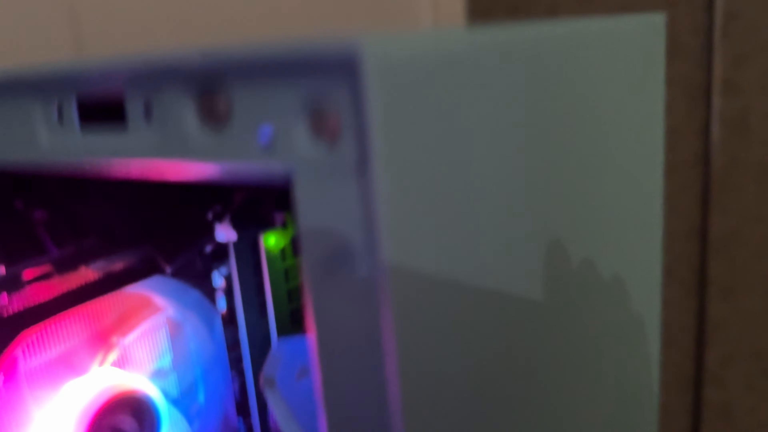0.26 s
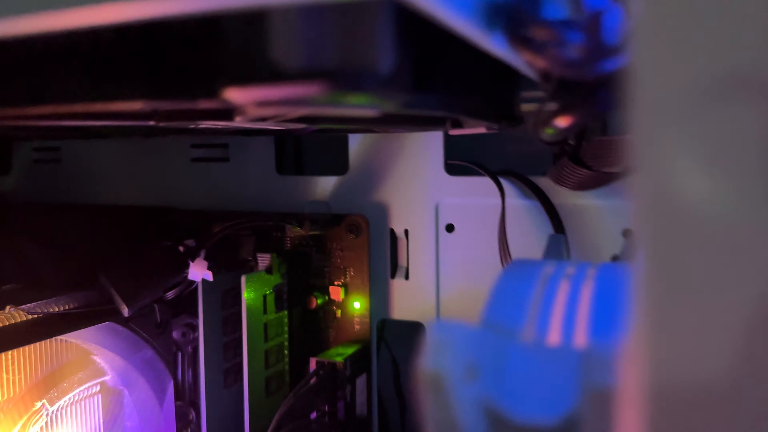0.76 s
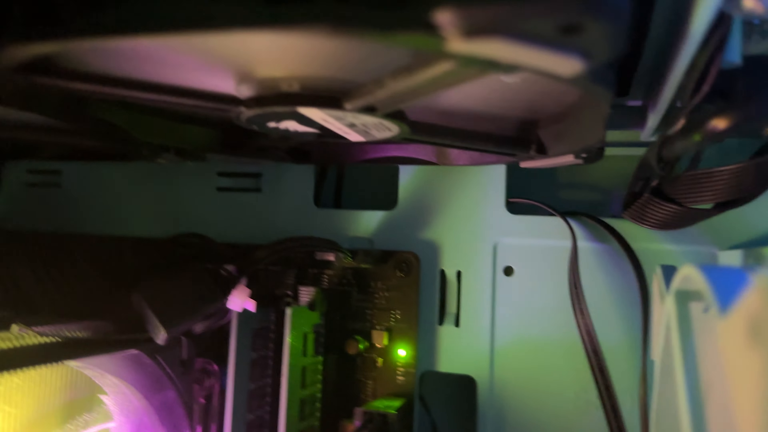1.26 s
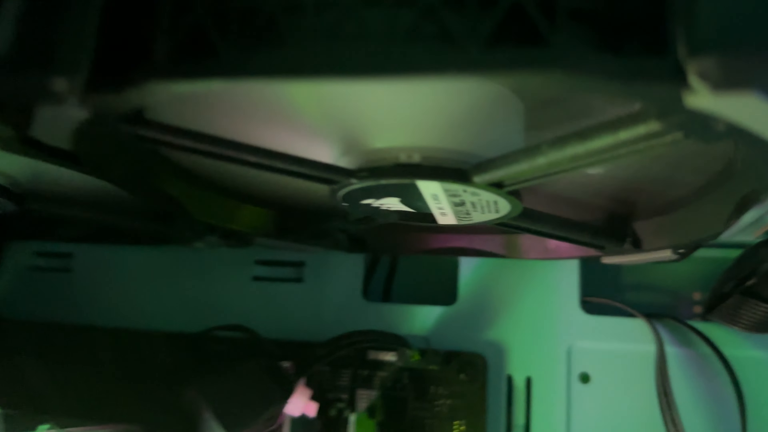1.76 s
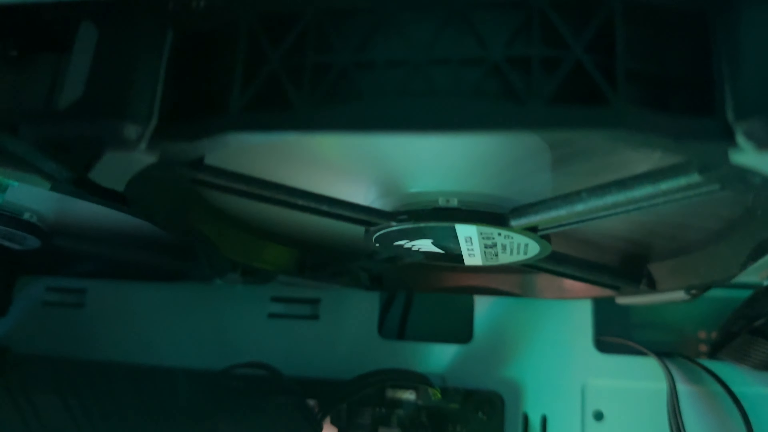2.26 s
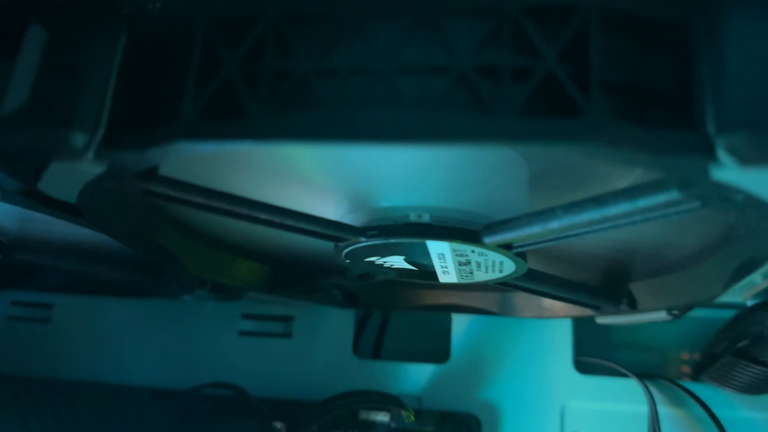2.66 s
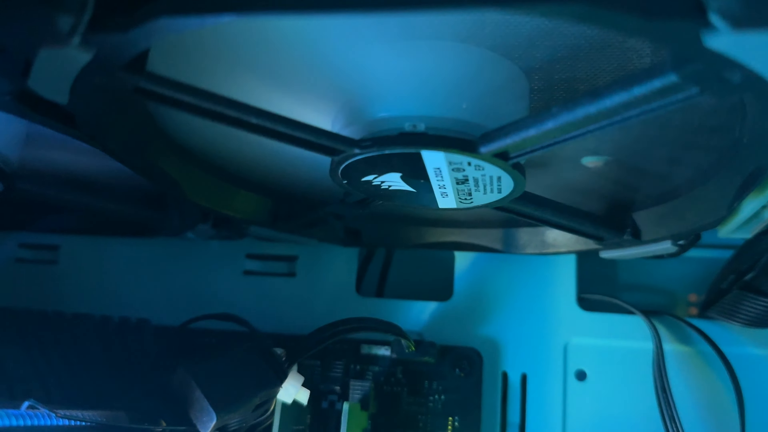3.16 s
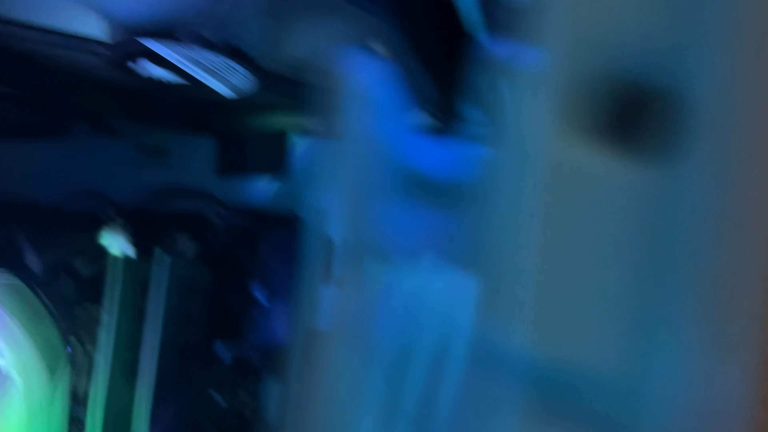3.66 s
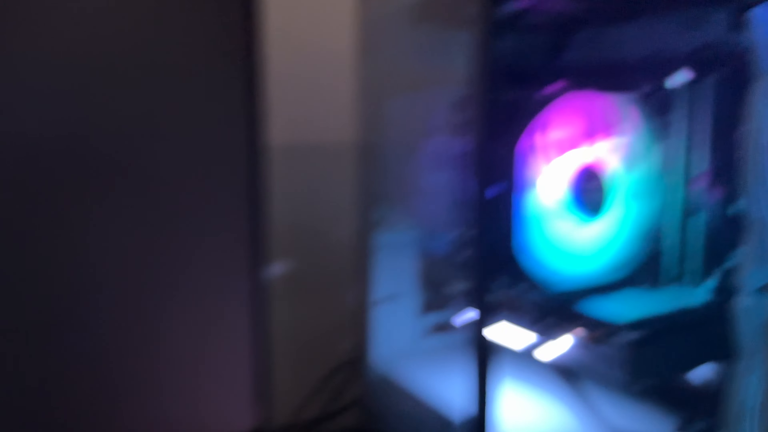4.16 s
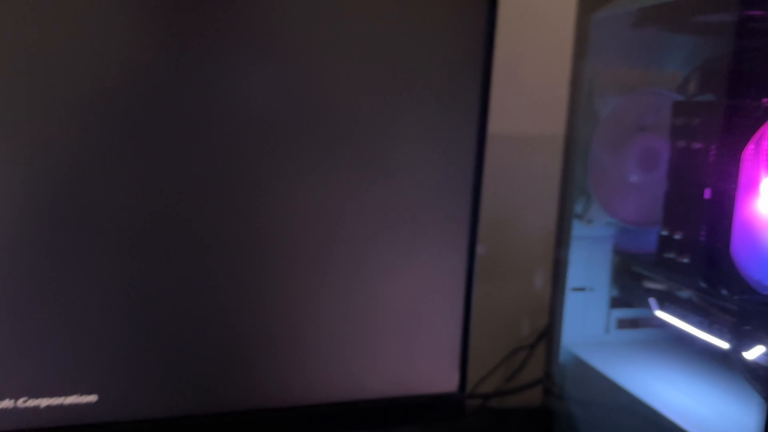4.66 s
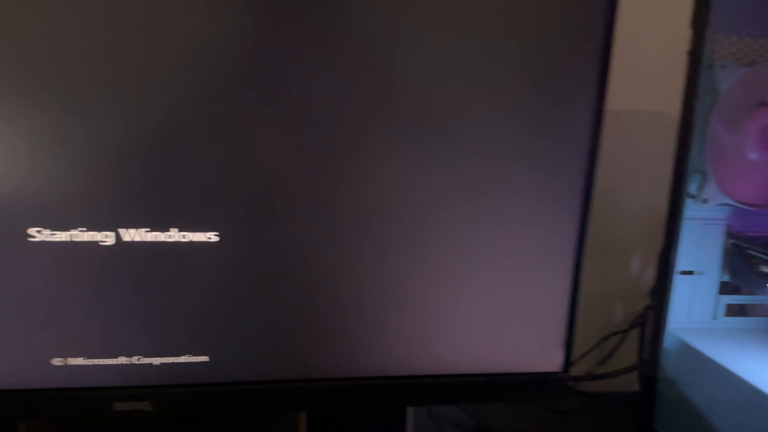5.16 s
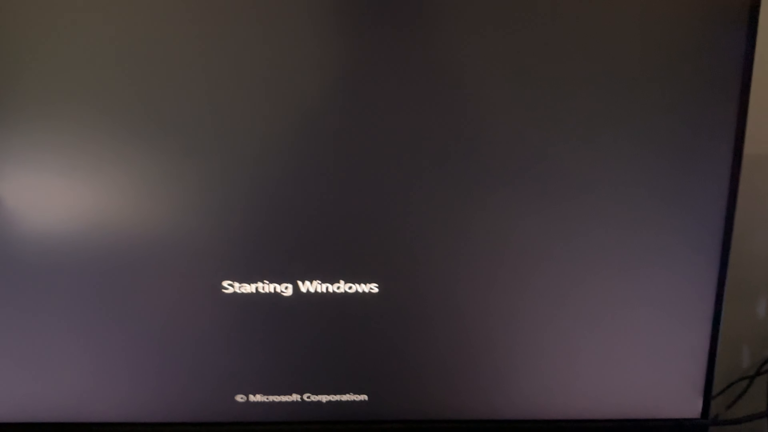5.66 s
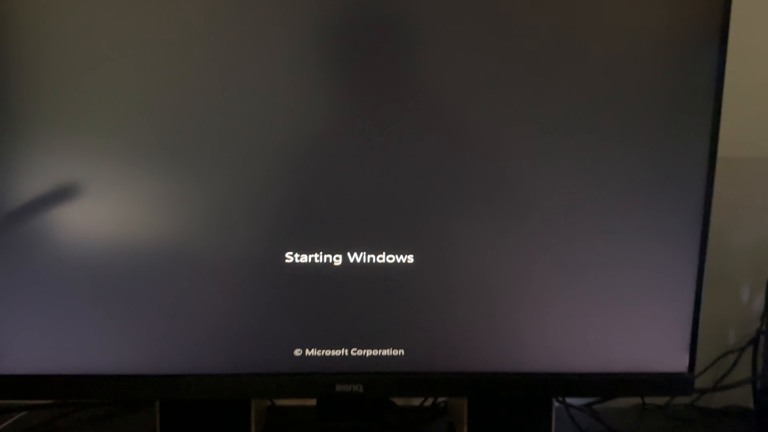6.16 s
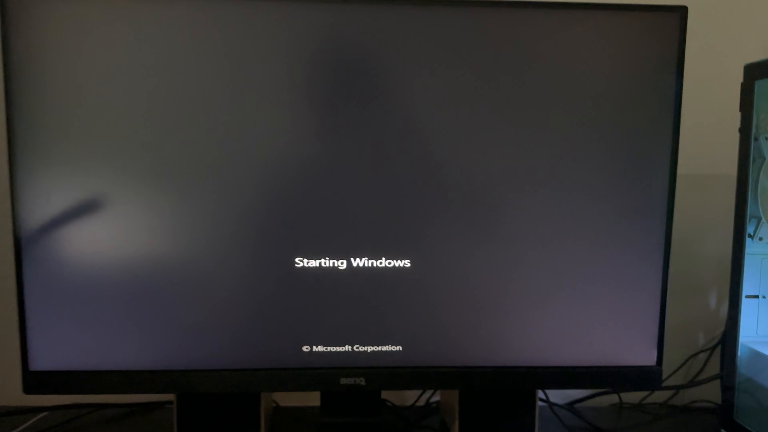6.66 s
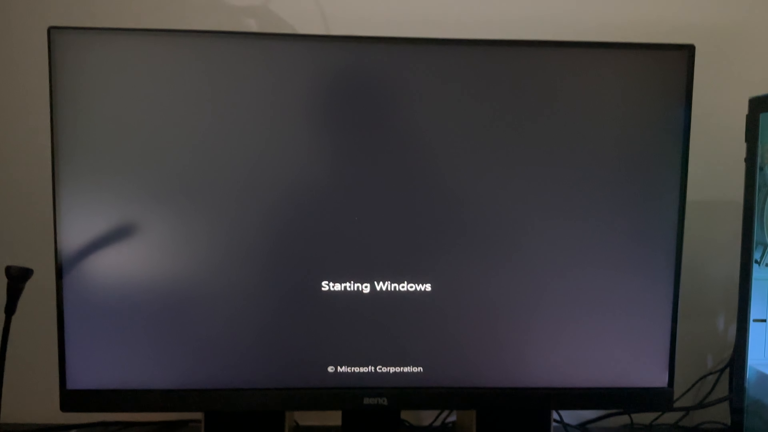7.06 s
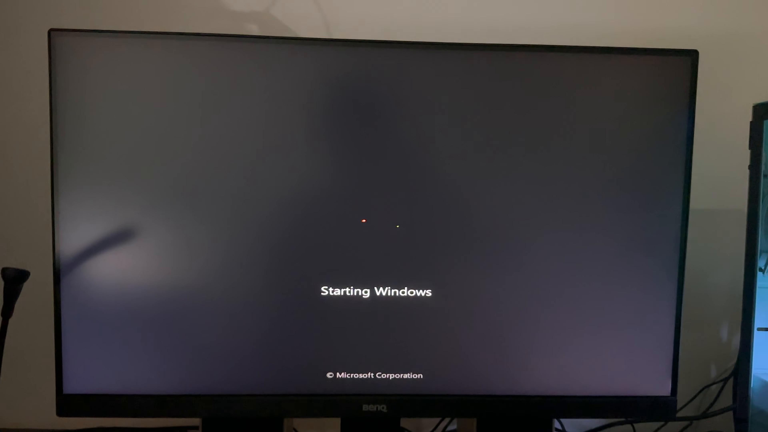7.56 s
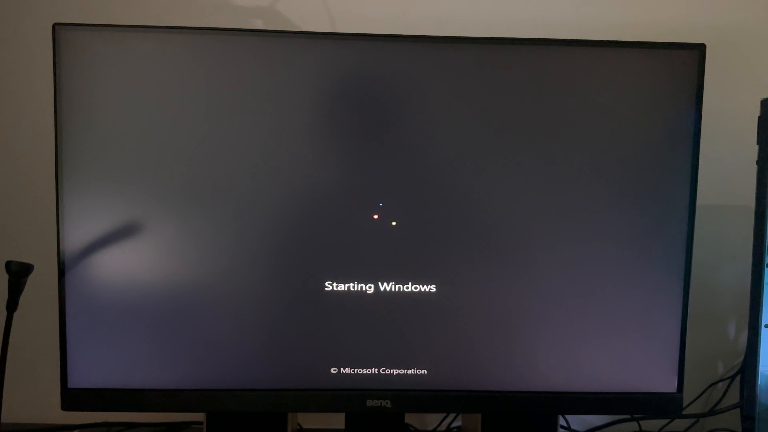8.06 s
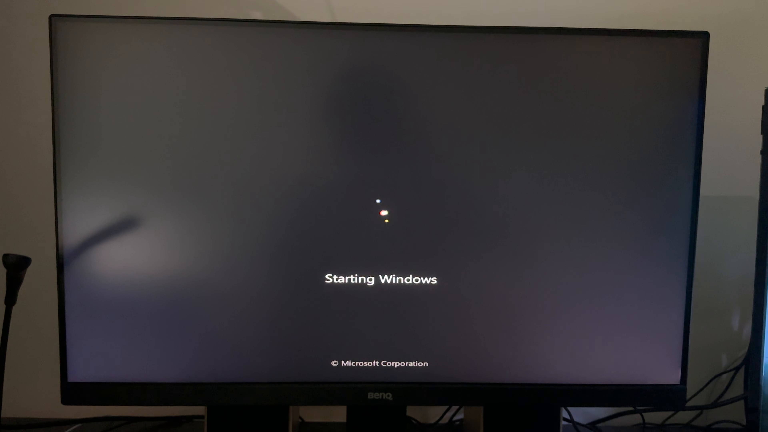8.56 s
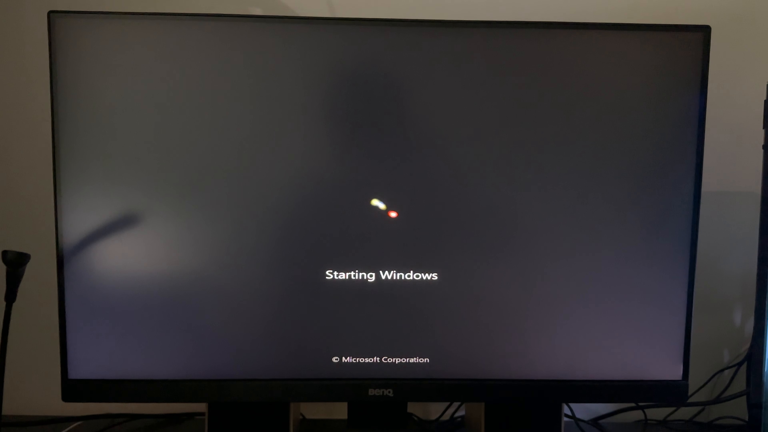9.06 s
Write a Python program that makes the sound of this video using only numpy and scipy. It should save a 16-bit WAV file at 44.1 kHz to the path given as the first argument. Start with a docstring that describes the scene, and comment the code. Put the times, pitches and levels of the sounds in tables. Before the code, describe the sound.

A case fan blows loudly onto the microphone with fluttering low thuds, recedes, a single sharp bang rings briefly, then distant fan hum continues.

```python
"""A computer case fan in a small room: shaped noise for its rush and its diffuse sound, sines for the blade tone.
A handheld two-port microphone starts in the air stream, where low noise buffets the ports and eddies
thump as waves of falling pitch, then draws back. Something slams once (noise crack with a sharp front of
band-passed bursts, plus decaying modes); ticks and a soft rustle, also band-passed noise, follow.
The fan hums on from further off."""
import sys
import numpy as np
from scipy import signal
from scipy.fft import rfft, irfft
from scipy.io import wavfile
from scipy.ndimage import uniform_filter1d

SR = 44100
rng = np.random.default_rng(int(sys.argv[2]) if len(sys.argv) > 2 else 0)


def gain_from_db(level_db):
    """Convert decibel levels to linear amplitude factors (20 dB per decade)."""
    decades = np.asarray(level_db, float) / 20
    return 10 ** decades


def store_wav(level_fs):
    """Save 16-bit WAV to argv[1]."""
    pcm = np.round(np.clip(np.atleast_2d(level_fs), -1, 1) * 32767)
    wavfile.write(sys.argv[1], SR, pcm.T.astype(np.int16))


N = 410130


def evened(x):
    """Scaled to rms 1."""
    return x / np.sqrt(np.mean(abs(x) ** 2) + 1e-20)


def read(points, hz):
    """A spectrum table at hz, interpolated over log frequency."""
    f, value = np.transpose(points)
    return np.interp(np.log(hz + 1), np.log(f + 1), value)


def played(rows, s):
    """Every column of a time table at the times s."""
    t, *columns = np.transpose(rows)
    return [np.interp(s, t, c) for c in columns]


def shape(points, hz, lo_hz, hi_hz):
    """A spectrum in dB whose power between lo_hz and hi_hz sums to 1."""
    db = read(points, hz)
    in_band = (hz > lo_hz) & (hz < hi_hz)
    return db - 10 * np.log10(np.sum(gain_from_db(db[in_band]) ** 2))


def above(hz, corner_hz):
    """Smooth step from 0 to 1 around corner_hz."""
    return 1 / (1 + (corner_hz / (hz + 1)) ** 4)


def below(hz, corner_hz):
    """Smooth step from 1 to 0 around corner_hz."""
    return 1 / (1 + (hz / corner_hz) ** 4)


def resonances(rows, hz):
    """Sum of bell-shaped peaks or dips in dB."""
    return sum(db / (1 + (2 * (hz - f) / width_hz) ** 2) for f, width_hz, db in rows)


def sides(pan_db):
    """Left and right gains for a level gap between the ports."""
    return gain_from_db(np.array([pan_db / 2, -pan_db / 2]))


def add(mix, s, sound):
    """Mixes a two-channel sound in at time s."""
    part = mix[:, round(s * SR):][:, :sound.shape[1]]
    part += sound[:, :part.shape[1]]


def wander(rate_hz, count):
    """Slow random drifts of rms 1: 24 sines up to rate_hz, the slower the stronger."""
    t = np.arange(0, N / SR + 1, 1 / 200)
    drifts = []
    for turns in rng.random((count, 24)):
        partials = zip(np.geomspace(rate_hz / 8, rate_hz, 24), turns)
        drift = sum(np.sin(2 * np.pi * (f * t + p)) / np.sqrt(f) for f, p in partials)
        drifts.append(np.interp(np.arange(N) / SR, t, evened(drift)))
    return drifts


# left-right likeness before same_scale, near mono at the top: (frequency [Hz], correlation [0-1])
LIKENESS = [(60, 0.72), (150, 0.78), (400, 0.46), (700, .25), (1500, 0.083), (6800, 0.084), (9000, 0.34),
            (15000, 0.794)]
# (frequency [Hz], lead of the left channel [rad])
LEFT_LEAD = [(0, 0), (520, 0), (860, -2.5), (1460, -1), (2070, -1.9), (3450, 4), (6370, 12.5), (7490, 14),
             (10600, 12.6), (16000, 12.6)]


def noise(colour, seconds, size, same_scale=1, patchy_db=.7):
    """Two-channel noise: colour(hz, s) gives level and side gap in dB; faint patches drift across it."""
    hz = np.fft.rfftfreq(size, 1 / SR)[:, None]
    s = np.arange(int(seconds * SR) * 4 // size + 6) * size / 4 / SR
    a, b, c, d, patches = rng.standard_normal((len(s), len(hz), 5)).T
    patches = evened(uniform_filter1d(uniform_filter1d(patches, 12, 0), 8, 1))
    same = np.clip(same_scale * read(LIKENESS, hz), -1, 1)
    left = a + 1j * b
    right = same * left + np.sqrt(1 - same ** 2) * (c + 1j * d)
    right = right * np.exp(-1j * read(LEFT_LEAD, hz))
    level_db, pan_db = colour(hz, s)
    z = np.array([left, right]) * gain_from_db(level_db + patchy_db * patches) * sides(pan_db + 0 * patches)
    sound = signal.istft(z, nperseg=size, noverlap=size * 3 // 4)[1]
    return np.sqrt(3 / 2) * sound[:, :int(seconds * SR)]  # offsets the overlap's averaging


# path of the microphone: (time [s], distance from the fan [m], turn as left over right [dB])
PATH = [(0, 0.24, 0), (.4, 0.31, 5.5), (.9, 0.27, 2), (1.5, 0.19, 0), (2.4, 0.15, -3.5), (3.4, 0.19, -1),
        (3.7, 0.31, 5), (3.95, 0.54, 1), (4.3, 0.96, -11), (5.3, 0.83, -3), (6.5, 1.34, -4)]
JET_DB_AT_1M = -62


def jet_db(s):
    """Level of the close rush, falling 6 dB per doubling of distance."""
    return JET_DB_AT_1M - 20 * np.log10(np.maximum(played(PATH, s)[0], .05))


# colour facing the fan: (frequency [Hz], relative level [dB])
JET_FACING = [(260, -27), (450, -15), (600, -9.5), (850, -8), (1000, -16.5), (1200, -7.5), (1450, -15.5),
              (2300, -17), (3600, -22.5), (4700, -22), (5250, -23.5), (6300, -25.5), (7500, -28),
              (10500, -34.5), (12000, -45), (15500, -44.5), (16300, -81.5)]
# colour from the side: (frequency [Hz], relative level [dB])
JET_ASLANT = [(260, -41), (450, -3.5), (485, -7), (815, 0), (892, -20.5), (1020, -1.5), (1330, 0.5),
              (2840, -6.5), (3400, -18), (5890, -11.5), (7470, -23.5), (10400, -26.5), (15700, -45)]
# (time [s], share of the facing colour [0-1])
FACING = [(.4, 0.03), (.65, 0.88)]
# lift of the rush over 4 kHz: (time [s], level [dB])
JET_TREBLE = [(.7, 1), (1.3, 0.5), (2.2, -1.5), (2.9, -0.5), (3.5, 3), (4, 0)]
# (frequency [Hz], left over right before the turn is added [dB])
JET_SIDES = [(60, 6), (110, 9.5), (200, 8.0), (380, 3.5), (700, 12.5), (1290, 6.5), (2380, 1.5),
             (4400, 9.5), (8120, 5), (15000, -3)]


def jet():
    """Broad rush off the blades; its colour shifts as the microphone turns to face the fan."""
    def colour(hz, s):
        facing = np.clip(played(FACING, s)[0], 0, 1)
        facing_db = facing * shape(JET_FACING, hz, 600, 6000)
        aslant_db = (1 - facing) * shape(JET_ASLANT, hz, 600, 6000)
        treble_db = played(JET_TREBLE, s)[0] * above(hz, 4000)
        turn_db = played(PATH, s)[1]
        return facing_db + aslant_db + treble_db + jet_db(s), read(JET_SIDES, hz) + turn_db
    return noise(colour, N / SR, size=1024, patchy_db=1.5)


# swing from beside the case to the open room: (time [s], share of open room [0-1])
OPENING = [(4.2, .02), (5.3, .45), (5.8, .9), (6.5, .99)]


def beside(s):
    """How far the microphone still stands in the lee of the case, 1 to 0."""
    return 1 - np.clip(played(OPENING, s)[0], 0, 1)


# close blade tone: (time [s], fundamental level [dB], second harmonic level [dB])
CLOSE_BLADES = [(0, -62.5, -58.5), (1, -47.5, -49.5), (2, -46.5, -47), (3, -56, -48), (3.6, -53.5, -51),
                (4, -71, -67.5)]
# (harmonic of the blade rate [-], level re jet [dB], level re open room [dB], left over right [dB])
HARMONICS = [(3, -17.5, -32.5, 16), (4, -26.5, -16, -18), (9, -23.5, -32.5, 14.5), (10, -30, -29, 3),
             (11, -21.5, -37, -1), (12, -30, -37.5, 1)]
BLADE_START_HZ, BLADE_SAG_HZ_PER_S = 211.65, .09
# per partial: fundamental, second harmonic
FAR_BLADES_DB, BESIDE_BLADES_DB = (-56.5, -57), (-16, -7.5)  # in the open room; change beside the case
NEAR_PAN_DB, FAR_PAN_DB = (15, 20.5), (-3, 1)
WAVER_DB, SLIP_RAD = (3, 1.6), (.45, .3)  # rms


def blades():
    """Blade-passing tone and harmonics as sines wavering in level and phase, each beaming its own way."""
    s = np.arange(N) / SR
    lee = beside(s)
    phase = 2 * np.pi * np.cumsum(BLADE_START_HZ - BLADE_SAG_HZ_PER_S * s) / SR
    voices = []  # (harmonic, gain, left over right dB, level waver dB, phase waver rad)
    for k, close_db in enumerate(played(CLOSE_BLADES, s)):
        near = gain_from_db(close_db)
        far = gain_from_db(FAR_BLADES_DB[k] + BESIDE_BLADES_DB[k] * lee)
        pan_db = (near * NEAR_PAN_DB[k] + far * FAR_PAN_DB[k]) / (near + far)
        voices.append((k + 1, near + far, pan_db, WAVER_DB[k], SLIP_RAD[k]))
    for k, near_db, far_db, pan_db in HARMONICS:
        gain = gain_from_db(jet_db(s) + near_db) + gain_from_db(ROOM_DB + far_db - 10.5 * lee)
        voices.append((k, gain, pan_db + 0 * s, 2.2, .35))
    out = np.zeros((2, N))
    for k, gain, pan_db, waver_db, slip_rad in voices:
        swell, drift = wander(14, count=2)
        tone = np.sin(k * phase + slip_rad * drift)
        out += np.sqrt(2) * gain * gain_from_db(waver_db * swell) * sides(pan_db) * tone
    return out


# (frequency [Hz], relative level [dB])
BUFFET_COLOUR = [(20, -22), (40, -2.5), (70, 1.5), (120, 4), (200, -0.5), (350, -2.5), (500, -9),
                 (700, -25.5), (1000, -66)]
# air stream at the ports: (time [s], speed [m/s])
STREAM = [(0, 0.78), (.65, 1.09), (.85, 1.56), (1.6, 1.67), (1.95, 2.53), (2.4, 2.1), (3.2, 2.18),
          (3.5, 1.31), (3.85, .48), (4.2, 0.11)]
BUFFET_DB_AT_1M_PER_S, BUFFET_PAN_DB = -53, 6


def buffet():
    """Lumpy low pressure swings on the ports, growing with the square of the air speed."""
    def colour(hz, s):
        speed_m_per_s = np.maximum(played(STREAM, s)[0], .01)
        level_db = BUFFET_DB_AT_1M_PER_S + 40 * np.log10(speed_m_per_s)
        return shape(BUFFET_COLOUR, hz, 35, 180) + level_db, BUFFET_PAN_DB + 0 * hz
    lumps = gain_from_db(3.2 * wander(30, count=1)[0])
    return noise(colour, N / SR, size=2048, same_scale=0.53) * lumps


# eddies sweeping past: (time [s], peak level before panning [dB], start pitch [Hz], length [s])
EDDIES = [(0.416, -35.5, 2200, 0.0028), (1.871, -17.5, 322, 0.031), (1.943, -16.5, 300, 0.025),
          (1.972, -7.5, 288, 0.01), (1.984, -19, 130, 0.018), (2.004, -16.5, 90, 0.023),
          (2.082, -19, 294, 0.034), (2.119, -22, 170, 0.013), (2.177, -22.5, 128, 0.041),
          (2.231, -23, 170, 0.033), (2.272, -25, 130, .028), (2.363, -28.5, 296, 0.028),
          (2.433, -21, 307, 0.035), (2.618, -23, 443, 0.02), (2.643, -31, 1400, 0.0051),
          (2.707, -33.5, 256, .023), (2.853, -26, 452, 0.027), (2.934, -27, 305, 0.03),
          (3.139, -31, 326, 0.012), (3.155, -27, 130, 0.034), (3.235, -23, 330, 0.015),
          (3.392, -32.5, 244, 0.023)]
EDDY_SLOWING = 0.296  # share of the length in which the pitch falls most of the way
EDDY_END_TURNS, EDDY_PAN_DB = 1.43, 5.5  # end pitch in turns per length


def eddy(db, start_hz, seconds):
    """An uneven pressure wave that slows from start to end pitch as the eddy passes."""
    end_hz = EDDY_END_TURNS / seconds
    u = np.arange(0, 1.5, 1 / (seconds * SR))  # time in lengths
    rough = rng.standard_normal((2, 6000))
    shake, lump = (evened(signal.fftconvolve(v, np.hanning(500), "same"))[:len(u)] for v in rough)
    hz = end_hz + (start_hz - end_hz) * np.exp(-u / EDDY_SLOWING)
    hz = hz * np.exp(.15 * shake)
    swell = np.sin(np.pi * (u / 1.5) ** .5) ** 2 * gain_from_db(2.5 * lump) * (end_hz / hz) ** .3
    wave = swell * np.sin(2 * np.pi * np.cumsum(hz) / SR)
    return gain_from_db(db) * sides(EDDY_PAN_DB)[:, None] * wave / abs(wave).max()


# crack: (frequency [Hz], relative level [dB])
SLAM_COLOUR = [(35, -35), (60, -12), (230, -6.5), (600, -13.5), (800, -12.5), (1000, -6.5), (1400, -9),
               (2900, -14), (4500, -12), (6400, -14), (7400, -27.5), (10000, -24), (15500, -40),
               (16300, -72.5)]
# (frequency [Hz], t60 [s])
SLAM_TAIL = [(100, 0.33), (250, 0.66), (700, 0.43), (1400, 0.37), (2000, 0.32), (3000, 0.28), (5000, .24),
             (12800, 0.19)]
# slower after-sound: (frequency [Hz], level re crack [dB])
SLAM_LATE = [(100, -27), (500, -20), (1500, -18.5), (2500, -29.5), (5000, -29)]
# ring of the struck panels: (frequency [Hz], relative level [dB], t60 [s])
SLAM_MODES = [ (49, -1.5, 0.83), (125, 1, 0.24), (170, -6, 0.33), (209.3, 1.5, 0.196), (253.6, 0.5, .27),
              (494.5, -5.5, .4), (944, -0.5, 0.214), (1011, -1.5, .33), (1184, -3, 0.17), (1362, -5, 0.33),
              (1490, -6, .25), (1610, -10, 0.3), (2020, -6.5, 0.23), (2540, -17, 0.16), (3042, -10, 0.202),
              (3350, -9, 0.15), (4105, -2.5, 0.22), (4344, -10, .18), (4750, 0.5, 0.16)]
SLAM_S, SLAM_DB, SLAM_MODES_DB, SLAM_PAN_DB, SLAM_LATE_T60_S = 5.353, -13.5, -21.5, -2, .6


def slam():
    """A hard blow: a crack that the room carries on band by band, and the ring of the struck panels."""
    def colour(hz, s):
        early = gain_from_db(-60 * s / read(SLAM_TAIL, hz))
        late = gain_from_db(read(SLAM_LATE, hz) - 60 * s / SLAM_LATE_T60_S)
        level_db = shape(SLAM_COLOUR, hz, 60, 15000) + 20 * np.log10(early + late)
        return level_db, SLAM_PAN_DB * np.exp(-s / 0.068) + 0 * hz
    t = np.arange(2 * SR) / SR
    crack = gain_from_db(SLAM_DB) * noise(colour, 2, size=256, same_scale=1.1) * (1 - np.exp(-t / .002))
    ring = np.zeros((2, len(t)))
    starts = 2 * np.pi * rng.random((len(SLAM_MODES), 2, 1)) * [[1], [.2]]
    for (hz, db, t60), (start, gap) in zip(SLAM_MODES, starts):
        # low modes reach both ports nearly in step, higher ones a little apart
        phases = start + np.array([0 * gap, gap * np.minimum(hz / 1000, .8)])
        swell = gain_from_db(SLAM_MODES_DB + db - 60 * t / t60) * (1 - np.exp(-t * hz / 1.1))
        ring += swell * np.sin(2 * np.pi * hz * t + phases)
    return crack + sides(SLAM_PAN_DB)[:, None] * ring


# sharp front of the slam's crack (first two rows), then ticks and a soft rustle:
# (time [s], peak level before panning [dB], centre [Hz], t60 [s], left over right [dB])
BURSTS = [(5.3544, -12.5, 4470, .02, -6.5), (5.354, -16, 9960, 0.025, -5), (5.441, -35, 8500, .012, -6),
          (5.55, -40, 1250, .5, -2), (6.42, -60, 10000, .06, -1)]


def burst(db, hz, t60, pan_db):
    """A short burst of decaying noise, band-passed around one pitch."""
    t = np.arange(12000) / SR
    puff = rng.standard_normal(len(t)) * gain_from_db(-60 * t / t60) * (1 - np.exp(-t / 0.00057))
    band = signal.butter(3, [hz * .6, min(hz * 1.5, 15800)], "band", fs=SR, output="sos")
    pitched = signal.sosfilt(band, puff)
    return gain_from_db(db) * pitched / abs(pitched).max() * sides(pan_db)[:, None]


# (frequency [Hz], relative level [dB])
ROOM_COLOUR = [(25, -12), (45, -3), (65, 4.5), (90, -3.5), (130, 2.5), (220, 6.5), (330, 5.5), (480, 4),
               (560, -3.5), (1250, -3), (2500, -13), (6500, -18.5), (7500, -26.5), (10500, -34),
               (12000, -47), (15500, -51.5), (16200, -80.5)]
# (frequency [Hz], left over right in the open room [dB])
ROOM_SIDES = [(60, -.5), (200, -1), (380, 2), (700, -2), (1100, -3), (1700, -2), (2500, -1), (3700, 2),
              (5500, 3.5), (7500, 1.5), (9500, -1.5), (13000, 0)]
# case and room resonances: (frequency [Hz], width [Hz], lift [dB])
ROOM_PEAKS = [(65, 10, 5.5), (124.7, 10, 11.5), (242.7, 12, 14.5), (328.6, 16, 8.5), (489, 15, 12),
              (1466, 51.6, 4.5)]
ROOM_DB, OPEN_TREBLE_DB = -59.5, -2.5  # in the open room
# changes beside the case: level, left over right, under 90 Hz, under 240 Hz, over 6 kHz
BESIDE_DB, BESIDE_PAN_DB, BESIDE_SUB_DB, BESIDE_BASS_DB, BESIDE_TREBLE_DB = 3, -1.1, -1, -9.5, 7


def room():
    """Diffuse fan noise with a few resonances; its colour depends on where the microphone stands."""
    def colour(hz, s):
        lee = beside(s)
        level_db = ROOM_DB + BESIDE_DB * lee
        sub_db = BESIDE_SUB_DB * lee * below(hz, 90)
        bass_db = BESIDE_BASS_DB * lee * below(hz, 240)
        treble_db = (OPEN_TREBLE_DB + BESIDE_TREBLE_DB * lee) * above(hz, 6000)
        colour_db = shape(ROOM_COLOUR, hz, 600, 6000) + resonances(ROOM_PEAKS, hz)
        pan_db = read(ROOM_SIDES, hz) + BESIDE_PAN_DB * lee
        return colour_db + level_db + sub_db + bass_db + treble_db, pan_db
    return noise(colour, N / SR, size=4096)


def scene():
    """Fan, air stream, slam with its sharp front, ticks and rustle at the two ports."""
    mix = jet() + blades() + buffet() + room()
    for s, *row in EDDIES:
        add(mix, s, eddy(*row))
    add(mix, SLAM_S, slam())
    for s, *row in BURSTS:
        add(mix, s, burst(*row))
    return mix


# narrow hollows in the response of the ports: (frequency [Hz], width [Hz], level [dB])
PORT_DIPS = [(5200, 130, -4), (7560, 400, -7)]


def ports(dry):
    """Response of the microphone ports, with narrow hollows."""
    hz = np.fft.rfftfreq(N, 1 / SR)
    return irfft(rfft(dry) * gain_from_db(resonances(PORT_DIPS, hz)), N)


def band_limit(x):
    """A steep low-pass at the top of the band."""
    return signal.sosfilt(signal.butter(12, 16460, fs=SR, output="sos"), x)


def record(dry):
    """Hollows of the ports and 30 Hz low cut of the microphone."""
    low_cut = signal.butter(4, 30, "high", fs=SR, output="sos")
    mix = signal.sosfilt(low_cut, ports(dry))
    return band_limit(mix)


dry = scene()
out = record(dry)
store_wav(out)
```